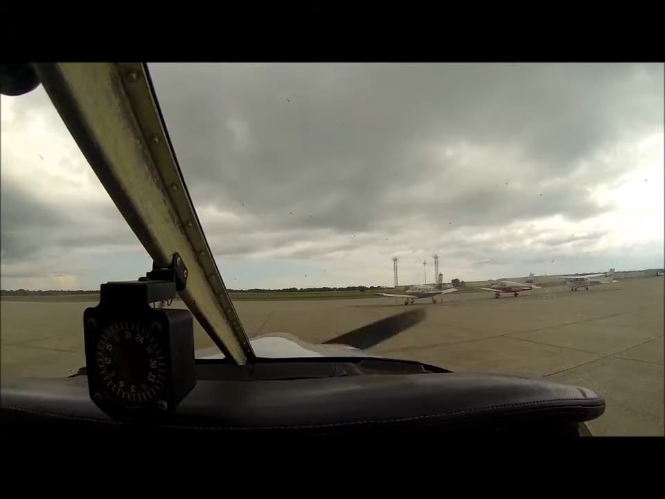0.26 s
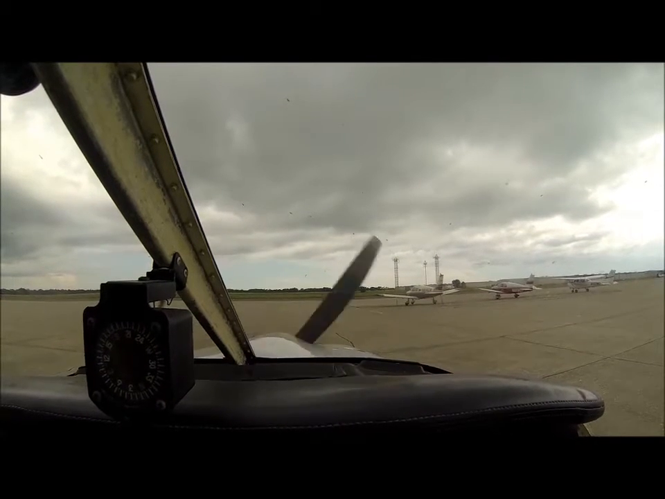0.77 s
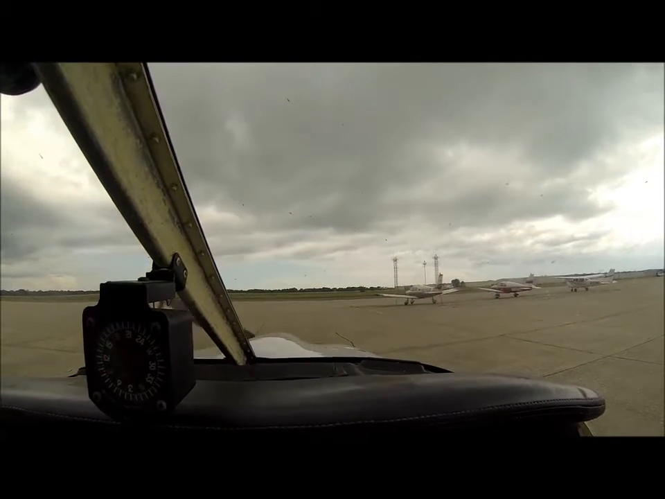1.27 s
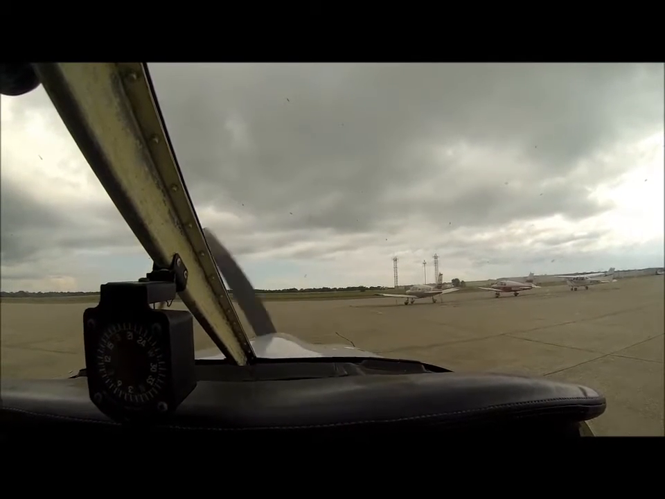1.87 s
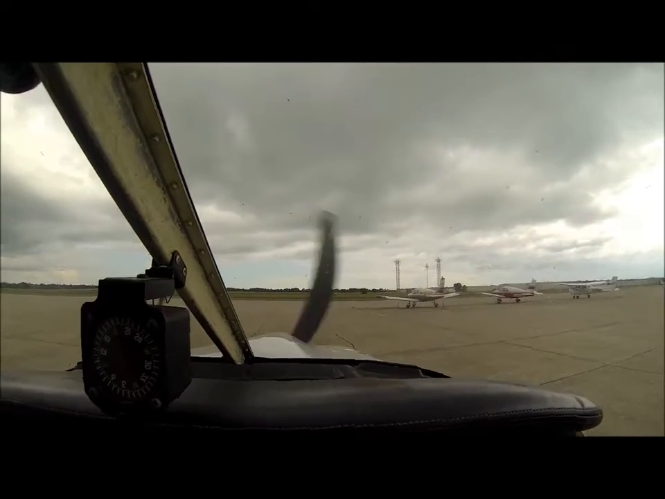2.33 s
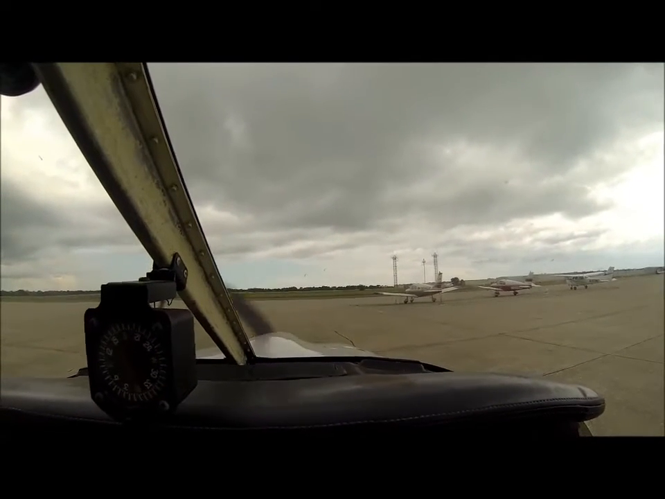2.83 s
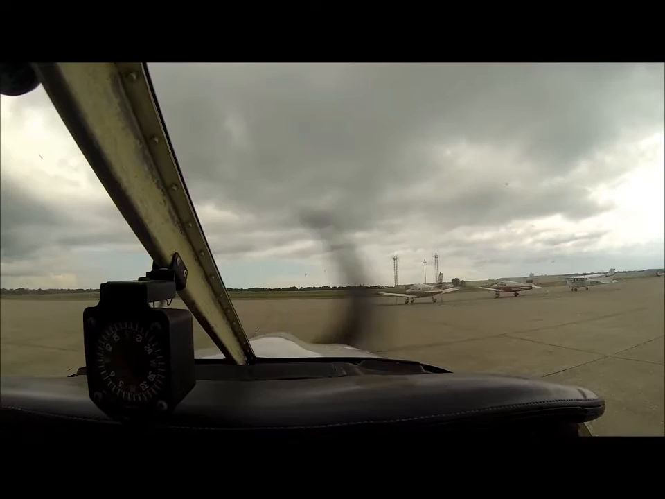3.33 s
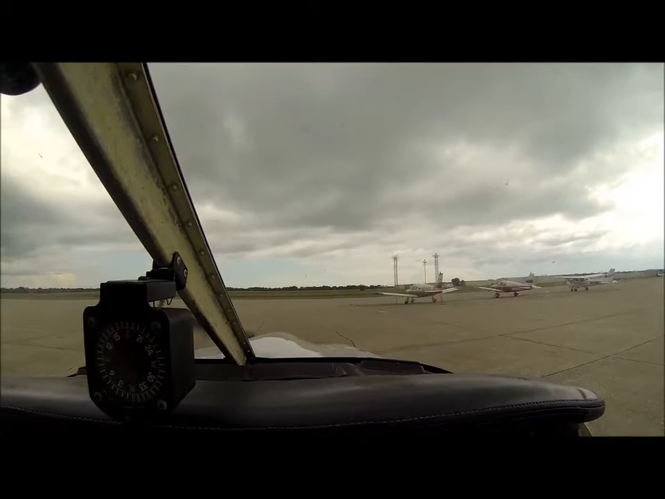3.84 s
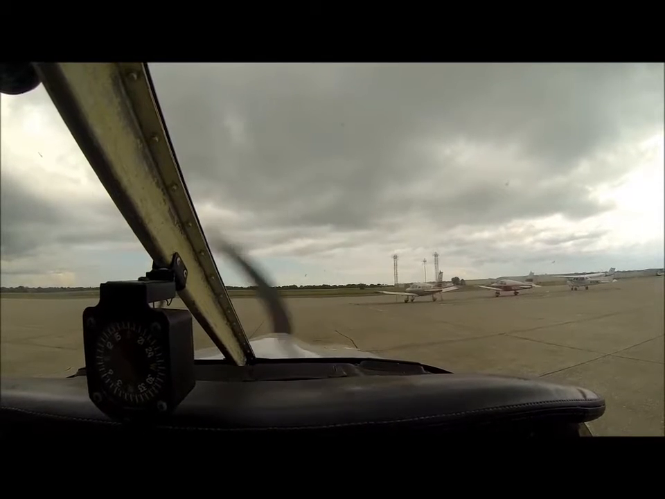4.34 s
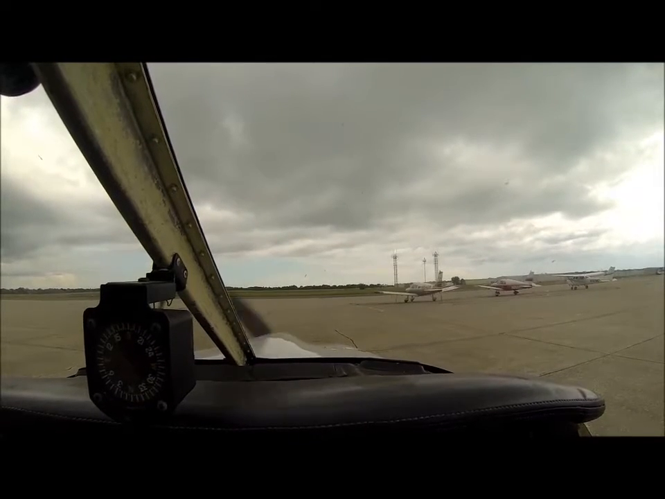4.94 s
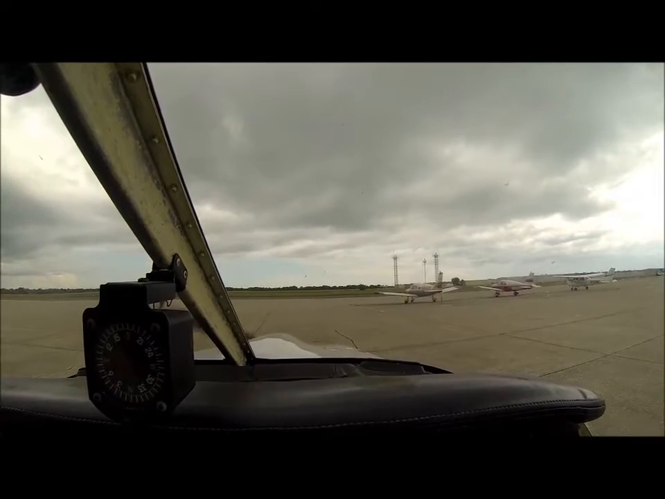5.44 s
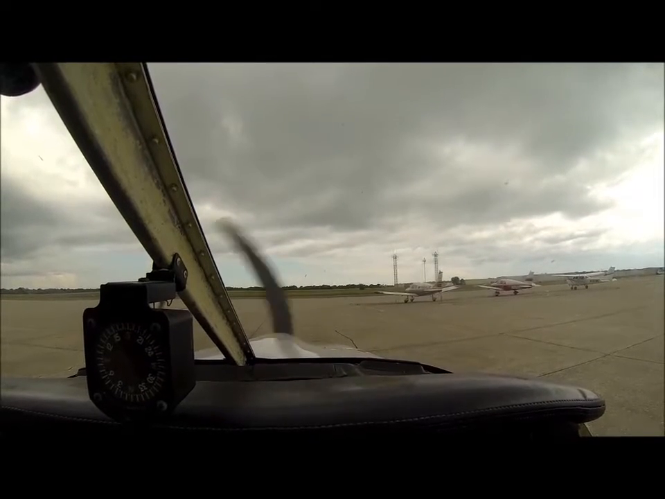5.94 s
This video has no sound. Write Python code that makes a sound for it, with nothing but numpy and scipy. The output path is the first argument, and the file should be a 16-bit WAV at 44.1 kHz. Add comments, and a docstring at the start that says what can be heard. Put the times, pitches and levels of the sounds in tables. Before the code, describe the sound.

From inside a light aircraft, a piston engine cranks, pops sharply, fires up and settles into a low, lumpy idle.

```python
"""A starter grinds through the compressions and the cabin booms: a four-cylinder light aircraft starting up.
The microphone is inside the cabin, close behind the engine. Sharp metallic pops ring through the cowling
as the engine stumbles; then it catches, runs up and sinks to a lumpy idle of exhaust pulses and propeller
tones. A limiter after the microphone ducks briefly on the loudest peaks."""
import sys
import numpy as np
from scipy import signal
from scipy.fft import rfft, irfft, next_fast_len
from scipy.io import wavfile
from scipy.ndimage import uniform_filter1d, minimum_filter1d, map_coordinates

SR = 44100
rng = np.random.default_rng(int(sys.argv[2]) if len(sys.argv) > 2 else 0)


def inscribe(sig):
    """Save sig as 16-bit PCM at rate SR to the path in sys.argv[1].

    A 1-D sig is mono; a 2-D sig holds one channel per row.
    Samples are clipped to [-1, 1] before scaling.
    """
    pcm = np.round(np.clip(np.atleast_2d(sig).T, -1, 1) * 32767)
    wavfile.write(sys.argv[1], SR, pcm.astype(np.int16))


N = 273420


def amp(db):
    """Decibels to gain."""
    return 10 ** (np.asarray(db) / 20)


def unit(x):
    """Scale to rms 1."""
    return x / np.sqrt(np.mean(x ** 2) + 1e-20)


def clock():
    """Time of each sample in seconds."""
    return np.arange(N) / SR


def ramp(start, seconds):
    """Rises from 0 to 1 in the given time."""
    return np.clip((clock() - start) / seconds, 0, 1)


def decay(t, t60):
    """Envelope that falls 60 dB in t60 seconds."""
    return amp(-60 * t / t60)


def curves(rows):
    """One value per sample for each column after the time."""
    times, *columns = np.transpose(rows)
    return [np.interp(clock(), times, column) for column in columns]


def swells(rows):
    """Envelope of bell-shaped surges from rows of centre t/s, half length/s, level/dB."""
    return sum(amp(db) * np.exp(-((clock() - s) / half) ** 2) for s, half, db in rows)


def wobble(rate):
    """A smooth random curve, rate knots a second."""
    return map_coordinates(rng.standard_normal(int(N * rate / SR) + 4), [clock() * rate])


def coloured(x, points):
    """Causal filter whose gain follows points of f/Hz, level/dB."""
    size = 2 * next_fast_len(len(x) // 2 + 4096)
    point_hz, db = np.transpose(points)
    hz = np.fft.rfftfreq(size, 1 / SR)
    log_gain = np.log(amp(np.interp(np.log(hz + 1), np.log(point_hz), db)))
    cepstrum = irfft(log_gain)
    cepstrum[1:size // 2] *= 2  # folded for minimum phase
    cepstrum[size // 2 + 1:] = 0
    return irfft(rfft(x, size) * np.exp(rfft(cepstrum)), size)[:len(x)]


def noise(points, gate=1):
    """Gated noise shaped by a spectrum, rms 1."""
    return unit(coloured(gate * rng.standard_normal(N), points))


def narrow(hz, width_hz):
    """A resonance, fixed or gliding, shaken at random, rms 1."""
    phase = 2 * np.pi * np.cumsum(hz * np.ones(N)) / SR
    return unit(wobble(width_hz) * np.cos(phase) + wobble(width_hz) * np.sin(phase))


def pulling(until_s=0.698, fade_s=0.18):
    """1 while the starter turns the engine alone, fading to 0 over the first kicks."""
    return 1 - ramp(until_s, fade_s)


def running(catch_s=2.36):
    """0 while cranking, 1 once the engine has caught."""
    return np.clip((clock() - catch_s) / 0.022 + .5, 0, 1)


# lurches of the airframe: centre t/s, half length/s, level/dB
AIRFRAME_LURCHES = [(.68, 0.08, -20), (5.05, 0.16, -25.5), (5.75, 0.046, -26), (6.11, 0.074, -16.5)]

def airframe(crank_db=-24, stumble_db=-32, run_db=-26):
    """All around the microphone the aircraft shudders under starter and engine, and at times lurches."""
    stumbling = 1 - pulling() - running()
    shake = amp(crank_db) * pulling() + amp(stumble_db) * stumbling + amp(run_db) * running()
    rumble = noise([(10, -13.5), (24, 2.0), (34, -7.5), (60, -4.5), (230, -120)])
    return (shake + swells(AIRFRAME_LURCHES)) * rumble


def cabin_boom(mode_hz=54.97, boom_db=-19, murmur_db=-39, kick_s=1.72, kick_db=-32.5):
    """The cabin booms at its lowest mode under the starter, and only murmurs once cylinders kick."""
    tone = np.sqrt(2) * np.sin(2 * np.pi * np.cumsum(mode_hz + 1.39 * wobble(10.33)) / SR)
    swell = amp(boom_db - 10 * (1 - ramp(0, 0.24)))
    murmur = amp(murmur_db) + amp(kick_db) * ramp(kick_s, 0.18)  # louder as the engine nearly catches
    return (1 - running()) * (pulling() * swell * tone + murmur * narrow(52, 40))


# intake whistle, faint from the cabin: t/s, f/Hz, level/dB
INTAKE_WHISTLE = [(4.74, 4835, -68), (5.15, 4400, -70), (5.27, 4480, -61.5), (5.8, 4460, -60.5),
                  (5.83, 4420, -69), (6.05, 4425, -64)]

def intake(width_hz=130, stutter_db=2.0):
    """Air whistles thinly and in fits past the throttle, sliding down as the engine slows."""
    hz, db = curves(INTAKE_WHISTLE)
    stutter = amp(stutter_db * (.4 * wobble(40) + wobble(250)))
    begun = clock() > INTAKE_WHISTLE[0][0]
    return begun * amp(db) * unit(stutter * narrow(hz, width_hz))


# groans of the starter gear, its lowest tooth tone flaring: t/s, f/Hz, level/dB
GEAR_GROANS = [(.228, 357.4, -28), (.275, 294.5, -31), (.445, 280, -24.5)]

def gear_groans(half_s=0.023):
    """The starter gear's lowest tooth tone groans briefly as it heaves over a compression."""
    return sum(swells([(s, half_s, db)]) * np.sin(2 * np.pi * hz * clock() + .5 * wobble(90))
               for s, hz, db in GEAR_GROANS)


# drag on the starter, which drives its jangle and grinding: t/s, level/dB
STARTER_DRAG = [(0.0, -37), (0.54, -38), (0.79, -34), (0.87, -44.5), (1.03, -46.5), (1.28, -35),
                (1.35, -46.5), (1.6, -43.5), (1.67, -37.5), (1.98, -37.5), (2.1, -40.5)]
# heavily damped modes of the pinion: f/Hz, level/dB relative to the drag
PINION_MODES = [(3310, -26), (3690, -27), (6500, -33), (12000, -47)]

def pinion(bursts_per_s=16, burst_at_s=0.1187, swing_db=4):
    """The loose starter pinion jangles in fitful gritty bursts, harder the more the engine drags."""
    drag_db, = curves(STARTER_DRAG)
    beat = np.cos(2 * np.pi * bursts_per_s * (clock() - burst_at_s))
    bursts = amp(swing_db * beat + 4 * wobble(14) + 3 * wobble(200))
    ring = sum(amp(db + 2 * wobble(20)) * narrow(hz, .11 * hz) for hz, db in PINION_MODES)
    return (1 - running()) * amp(drag_db) * unit(bursts) * ring


# gear growls as the starter takes load: centre t/s, half length/s, level/dB
LOAD_STROKES = [(.026, 0.02, -22.5), (.225, 0.064, -29), (.41, 0.016, -22.5), (.478, 0.022, -24),
                (.602, 0.023, -30), (.661, 0.012, -22), (.695, 0.013, -22.5), (.81, .015, -29),
                (1.122, 0.021, -31.5), (1.195, 0.028, -28), (1.25, 0.014, -32)]
# dry rubs of the pinion: t/s, level/dB
PINION_RUBS = [(0.603, -49.5), (0.766, -40), (1.196, -43.5)]
# tooth rate, sagging on each compression: t/s, f/Hz
TOOTH_RATE = [(0.03, 339), (0.16, 307), (0.22, 343.4), (0.26, 263), (0.41, 332.7), (0.445, 276), (0.5, 258),
              (0.6, 344.2)]
# its harmonics: multiple, relative level/dB
TOOTH_HARMONICS = [(1, -2), (2, 5.5), (3, -3.5), (5, -10.5), (6, -8)]
# spectra at the microphone of grinding gears, bright hiss and cabin thump: f/Hz, relative level/dB
GEAR_SPECTRUM = [(60, -8.5), (100, 10.5), (150, 0), (400, -5), (660, -1.5), (900, -6.5), (1100, -18),
                 (1850, -10.5), (2200, -20), (5000, -36), (7000, -56)]
HISS_SPECTRUM = [(1500, -3), (3600, 13.5), (5000, 11), (7000, 8.5), (10000, 0), (16000, -18)]
THUMP_SPECTRUM = [(12, -40.5), (25, -6), (60, 8), (85, 2), (140, 3), (200, -7.5), (280, -14), (500, -31.5),
                  (3000, -120)]
# steel parts that ring with starter and engine: f/Hz, relative level/dB
STEEL_MODES = [(1565, -2.5), (1862, -4)]

def starter(grit_db=3, rattle_db=4.0, grind_db=2, hiss_db=-25, scrape_db=-28.5, steel_db=-30):
    """Up in the nose, gear teeth growl and scrape on each compression and rattle in between."""
    drag_db, = curves(STARTER_DRAG)
    tooth_hz, = curves(TOOTH_RATE)
    growl = swells(LOAD_STROKES)
    scrape = amp(scrape_db) * growl + swells([(s, 0.0093, db) for s, db in PINION_RUBS])
    mesh = np.cumsum(tooth_hz * (1 + .036 * wobble(130))) / SR  # the flywheel never turns evenly
    # harmonics flare at random, as if sliding through the gear case's resonances
    whine = sum(amp(db + 3 * wobble(20)) * np.sin(2 * np.pi * (k * mesh + rng.random()))
                for k, db in TOOTH_HARMONICS)
    grit = amp(grit_db * wobble(140))
    strain = unit(unit(whine * grit) + 1.1 * noise(GEAR_SPECTRUM, grit))
    rattle = amp(rattle_db * wobble(130))
    heave = growl * (0.95 * strain + 0.26 * noise(THUMP_SPECTRUM))
    grind = amp(drag_db + grind_db) * noise(GEAR_SPECTRUM, rattle)
    hiss = scrape * noise(HISS_SPECTRUM, grit) + amp(drag_db + hiss_db) * noise(HISS_SPECTRUM, rattle)
    ring = sum(amp(db) * narrow(hz, 60) for hz, db in STEEL_MODES)
    steel = amp(drag_db + steel_db) * unit(rattle) * ring
    return (1 - running()) * (heave + grind + hiss + steel)


# muffled firings: centre t/s, half length/s, level/dB
WEAK_FIRINGS = [(1.988, 0.02, -23.5), (2.137, 0.028, -29), (2.455, 0.035, -33)]
# exhaust rasp as it reaches the cabin: f/Hz, relative level/dB
RASP_SPECTRUM = [(90, -18.5), (220, 2.5), (400, 1), (740, 4), (900, -3.5), (1080, -13), (1300, -17),
                 (1850, -15), (2200, -27.5), (4000, -57.5)]

def coughs(hiss_db=-25):
    """Single cylinders fire weakly into the exhaust."""
    gas = noise(RASP_SPECTRUM) + 1.6 * noise(THUMP_SPECTRUM) + amp(hiss_db) * noise(HISS_SPECTRUM)
    return swells(WEAK_FIRINGS) * gas


# blade tones before the cabin weights them: multiple of firing rate, run-up level/dB, settled level/dB
BLADE_TONES = [(1, -33, -18), (2, -21, -26), (3, -31, -27)]

def propeller(firing_hz, cycle, settle_s=3.38, settle_takes_s=0.1296, cabin_hz=45, db_per_octave=4.5):
    """The blades pass at the firing rate and press clean tones through the windscreen."""
    settled = ramp(settle_s - settle_takes_s / 2, settle_takes_s)
    tones = 0
    for k, early_db, late_db in BLADE_TONES:
        tone_db = early_db + (late_db - early_db) * settled
        # tones fade with their distance in pitch from the cabin's low resonance
        cabin_db = -db_per_octave * np.abs(np.log2(k * firing_hz / cabin_hz))
        tones += amp(tone_db + cabin_db) * np.sin(2 * np.pi * k * cycle)
    return tones * amp(1.5 * wobble(14))


# hard burns: t/s, thud level/dB, clap level/dB
HARD_BURNS = [(3.165, -11.5, -21), (3.451, -10, -25), (3.972, -24, -20), (3.988, -11.5, -27),
              (4.228, -15.5, -22), (4.28, -30, -17.5), (4.308, -14, -27), (4.369, -12, -21),
              (4.873, -16, -29), (5.75, -13, -32), (6.062, -10.5, -15.5), (6.16, -9, -26)]

def hard_firings(thud_hz=125, thud_t60=0.11, clap_t60=0.06):
    """A cylinder now and then burns much harder: one low thud in the cabin and a clap of gas."""
    out, t = np.zeros(N + SR), np.arange(SR // 5) / SR
    for s, thud_db, clap_db in HARD_BURNS:
        hz = thud_hz * np.exp(0.12 * rng.standard_normal())
        thud = decay(t, thud_t60) * np.sin(2 * np.pi * hz * t) * (1 - np.exp(-t / 0.0017))
        clap = coloured(rng.standard_normal(len(t)) * decay(t, clap_t60), RASP_SPECTRUM)
        out[round(s * SR):][:len(t)] += amp(thud_db) * thud + amp(clap_db) * clap / np.abs(clap).max()
    return out[:N]


# pops, close ahead of the microphone: t/s, level/dB, relative knock level/dB, relative tick level/dB
# (gain_db, knock_db and tick_db offset the three levels)
STUMBLE_POPS = [(0.654, -26.5, -4, -19), (0.692, -20, -8, -23), (0.731, -37.5, 8, -36),
                (0.8306, -10.5, -8, -28), (0.926, -19, -5.5, -32), (0.9749, -35.5, -3, -38),
                (1.1401, -18.5, -6.5, -41), (1.221, -15, -9, -42), (1.3129, -7, -10, -26),
                (1.4763, -30.5, -3.5, -36), (1.6885, -14, -9.5, -22.5), (1.8263, -12, -5.5, -24),
                (1.954, -25.5, -7, -14), (2.0136, -12.5, -9, -23), (2.0496, -5.5, -35, -13.5),
                (2.072, -12.5, -10, -26), (2.1046, -11.5, -11, -26), (2.1424, -11.5, -12, -32),
                (2.162, -5, -24, -20.5), (2.3095, 2.5, -16, -13.5)]
# modes of the cowling and engine mount: f/Hz, relative level/dB, t60/s
COWLING_MODES = [(945, -9.5, 0.044), (1290, -0.5, 0.022), (1555, 0, 0.031), (1894, -19, 0.11),
                 (2230, -5.5, 0.026), (2474, -8.5, 0.033), (2860, -6.5, 0.022), (3276, -10, 0.032),
                 (3690, -4, 0.019), (4420, -6, 0.015), (4720, -6, 0.015), (5220, -9.5, 0.012)]
# spectrum of a pop's crack: f/Hz, relative level/dB
CRACK_SPECTRUM = [(100, 7), (300, 4), (650, 8.5), (1000, -2.5), (2500, -0.5), (5100, -12), (11500, -43),
                  (16000, -52)]

def cowling_pops(knock_hz=595, knock_t60=0.05, crack_t60=0.034, recover_s=0.055, shortest=0.26,
                 gain_db=-2, knock_db=4.0, tick_db=8, crack_db=-4.0):
    """Each pop is a short crack that rings the cowling and knocks one large panel."""
    def struck(x):
        """Scale to a standard deviation of 1 over the first 4 ms."""
        return x / np.std(x[:SR // 250])

    out, t = np.zeros(N + SR), np.arange(SR // 4) / SR
    attack = 1 - np.exp(-t / 0.00057)
    hz, mode_db, t60 = np.transpose(COWLING_MODES)[:, :, None]
    pauses = np.diff([row[0] for row in STUMBLE_POPS], prepend=0)
    for (s, db, panel_db, treble_db), pause in zip(STUMBLE_POPS, pauses):
        length = 1 - (1 - shortest) * np.exp(-pause / recover_s)  # a hurried pop rings shorter
        sizes = amp(mode_db + 2 * rng.standard_normal(hz.shape))
        phases = rng.uniform(0, 2 * np.pi, hz.shape)
        # a damped mode is a cluster of close ones, and each pop favours another
        pitches = hz + .5 / t60 * rng.standard_normal(hz.shape)
        ring = np.sum(sizes * decay(t, t60 * length) * np.sin(2 * np.pi * pitches * t + phases), axis=0)
        panel_hz = knock_hz + 25 * rng.standard_normal()
        knock = decay(t, knock_t60 * length) * np.sin(2 * np.pi * panel_hz * t)
        crack = coloured(rng.standard_normal(len(t)) * decay(t, crack_t60 * length), CRACK_SPECTRUM)
        # the highest treble lasts only for the first contact
        tick = coloured(rng.standard_normal(len(t)) * decay(t, 0.0024), HISS_SPECTRUM)
        snap = struck(ring) + amp(crack_db) * struck(crack) + amp(treble_db + tick_db) * struck(tick)
        pop = struck(snap) + amp(panel_db + knock_db) * struck(knock)
        out[round(s * SR):][:len(t)] += amp(db + gain_db) * pop * attack
    return out[:N]


# firing rate through run-up and idle: t/s, f/Hz
FIRING_RATE = [(2.55, 25), (2.85, 42.3), (3.3, 56), (3.7, 48.8), (4.0, 49.6), (4.15, 46.3), (4.38, 51.5),
               (4.66, 41.4), (5.0, 35), (5.6, 32)]
# combustion effort: t/s, level/dB
COMBUSTION_EFFORT = [(2.6, -39.5), (2.65, -38), (2.82, -37.5), (3.02, -32), (3.2, -29.5), (3.46, -33.5),
                     (3.48, -37), (4.2, -33.5), (4.27, -33), (4.58, -37.5), (5.2, -36.5), (5.7, -33),
                     (6.2, -32.5)]
# the four cylinders in firing order: relative level/dB
CYLINDER_LEVELS = [-4, -4, -2.5, -2.5]
# spits of hissing gas: centre t/s, half length/s, level/dB
GAS_SPITS = [(2.43, 0.083, -59.5), (3.25, 0.23, -56.5), (3.435, 0.019, -50)]
# rushing air as it reaches the cabin: f/Hz, relative level/dB
AIR_SPECTRUM = [(900, -10.5), (2000, -0.5), (2700, 6), (3300, 0), (4200, -1), (4750, 1), (5400, -4.5),
                (6900, -7.5), (7800, -6), (11000, -15), (15500, -37)]

def engine(idle_effort_db=-34, thump_db=-28.5, rasp_db=-32.5, air_db=-53, steel_db=-55,
           scatter_db=2, jitter_s=0.0022, lope_db=0.7, blast_cycles=0.69, rasp_floor=0.55):
    """One exhaust pulse per firing: a cabin thump, a rasp of gas, a swish of air; all grow with effort."""
    firing_hz, = curves(FIRING_RATE)
    push_db = curves(COMBUSTION_EFFORT)[0] - idle_effort_db
    cycle = np.cumsum(firing_hz * running()) / SR
    firing, phase = cycle.astype(int), cycle % 1
    size_error, time_error = rng.standard_normal((512, 2)).T
    sizes = amp(np.resize(CYLINDER_LEVELS, len(size_error)) + scatter_db * size_error)
    starts = np.flatnonzero(np.diff(firing)) + 1
    shifts = (jitter_s * SR * time_error[firing[starts]]).astype(int)  # uneven burning shifts each pulse
    pulses = np.bincount(np.clip(starts + shifts, 0, N - 1), sizes[firing[starts]], N)
    blast = running() * sizes[firing] * np.exp(-phase / blast_cycles)
    lope = amp(lope_db * wobble(20))  # the burning swells and slackens from cycle to cycle
    thump = unit(lope * (unit(coloured(pulses, THUMP_SPECTRUM)) + noise(THUMP_SPECTRUM, blast)))
    rasp = noise(RASP_SPECTRUM, lope ** 2 * (rasp_floor * running() + blast))
    clatter = amp(1.5 * wobble(110))
    swish = lope * clatter * (1 + 0.18 * np.cos(2 * np.pi * (phase - .25)))
    steel = sum(amp(db + steel_db + push_db) * narrow(hz, 35) for hz, db in STEEL_MODES)
    air = amp(air_db + push_db) * noise(AIR_SPECTRUM, swish)
    sputter = noise(AIR_SPECTRUM, amp(2 * wobble(180)))
    spits = swells(GAS_SPITS) * unit(np.gradient(sputter))  # the gradient brightens the hiss
    exhaust = amp(thump_db + 0.55 * push_db) * thump + amp(rasp_db + push_db) * rasp + spits
    return running() * (propeller(firing_hz, cycle) + exhaust + air + steel)


def scene():
    """Everything that reaches the one microphone in the cabin."""
    cranking = starter() + cabin_boom() + pinion() + gear_groans()
    combustion = cowling_pops() + coughs() + engine() + hard_firings()
    return (cranking + combustion + intake() + airframe())[None]


def limiter(x, ceiling=.5, release_db_per_s=260):
    """Gain drops within about a millisecond on a peak and climbs back at a steady rate."""
    excess_db = 20 * np.log10(np.maximum(np.abs(x) / ceiling, 1))
    climb_db = release_db_per_s * clock()
    cut_db = np.maximum.accumulate(excess_db + climb_db, axis=-1) - climb_db
    gain_db = minimum_filter1d(-cut_db, size=41)
    return x * amp(uniform_filter1d(uniform_filter1d(gain_db, size=21), size=21))


def record(dry):
    """The microphone's signal passes a limiter and a steep treble cut."""
    lowpass = signal.butter(N=24, Wn=15500, fs=SR, output="sos")
    return signal.sosfilt(lowpass, limiter(dry))


dry = scene()
out = record(dry)
inscribe(out)
```